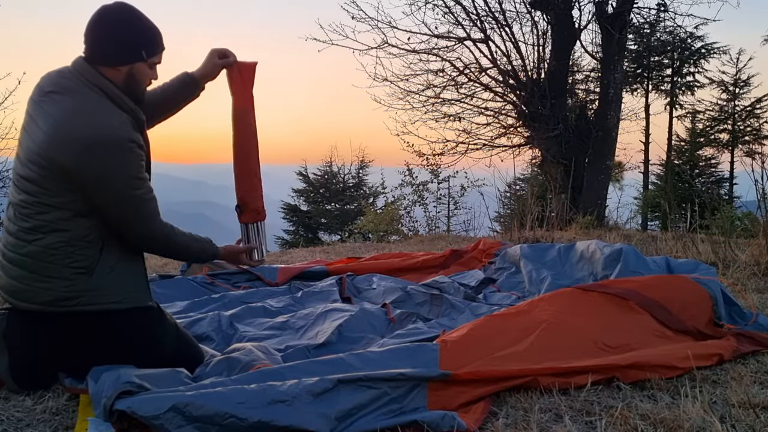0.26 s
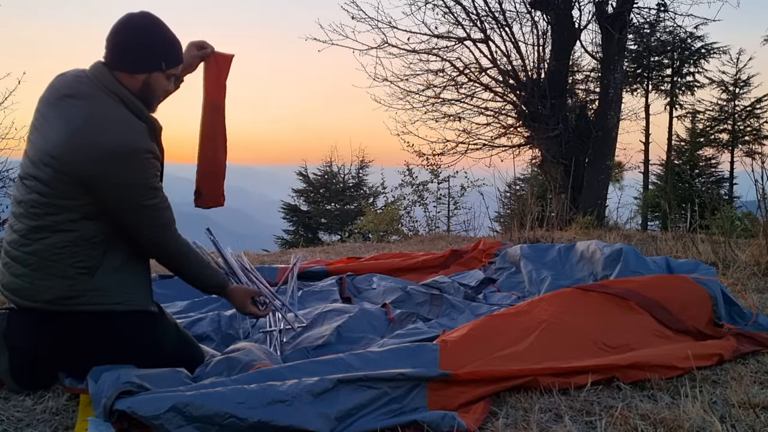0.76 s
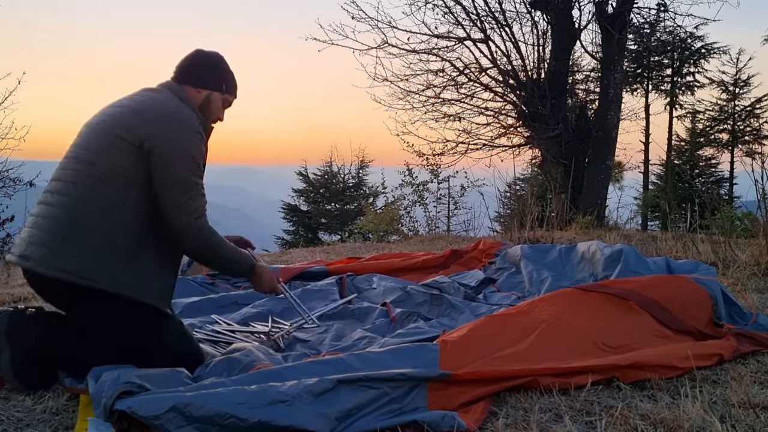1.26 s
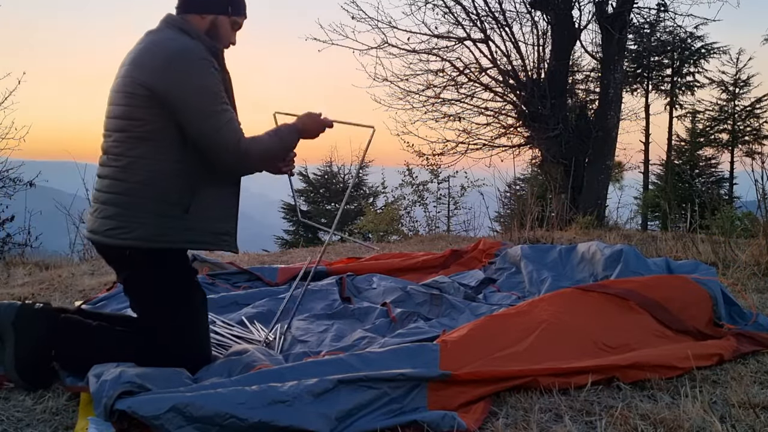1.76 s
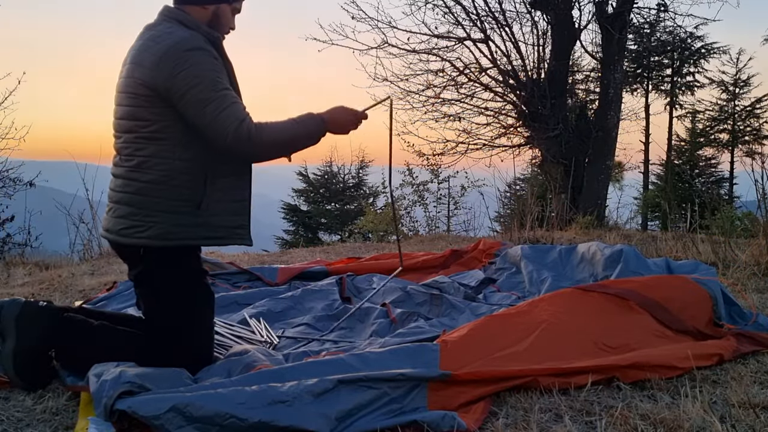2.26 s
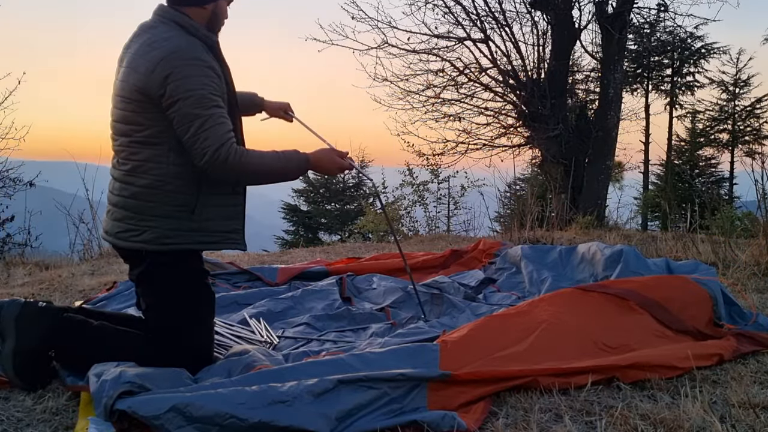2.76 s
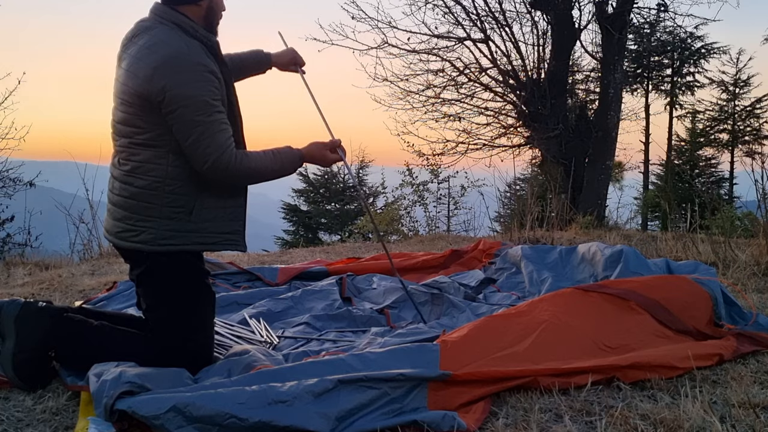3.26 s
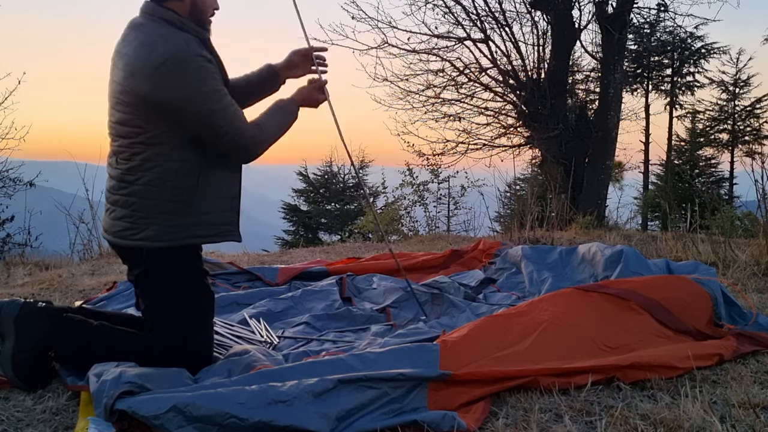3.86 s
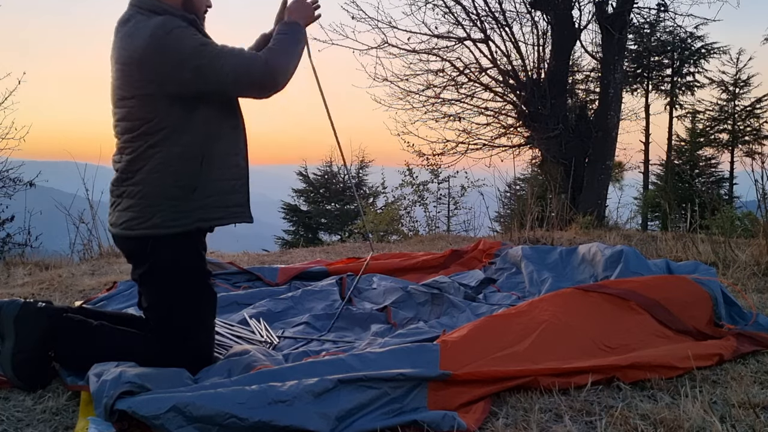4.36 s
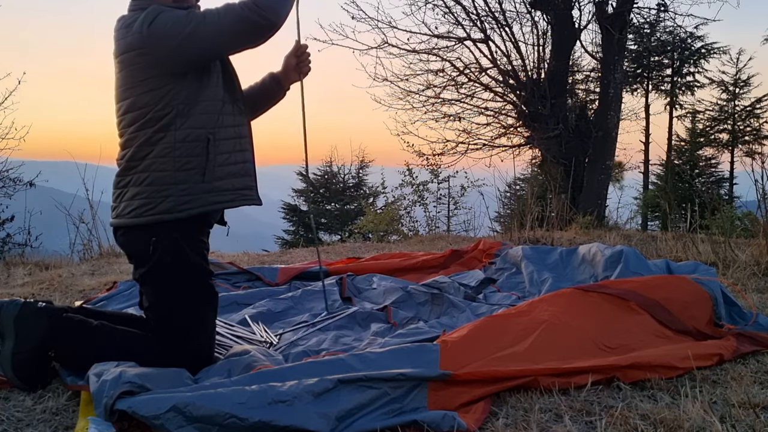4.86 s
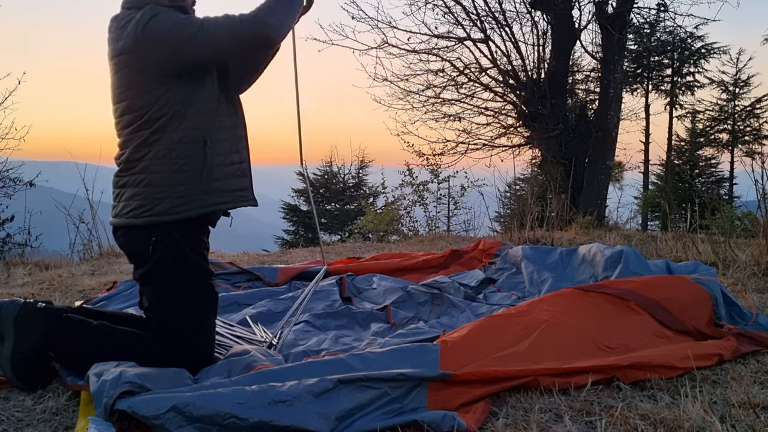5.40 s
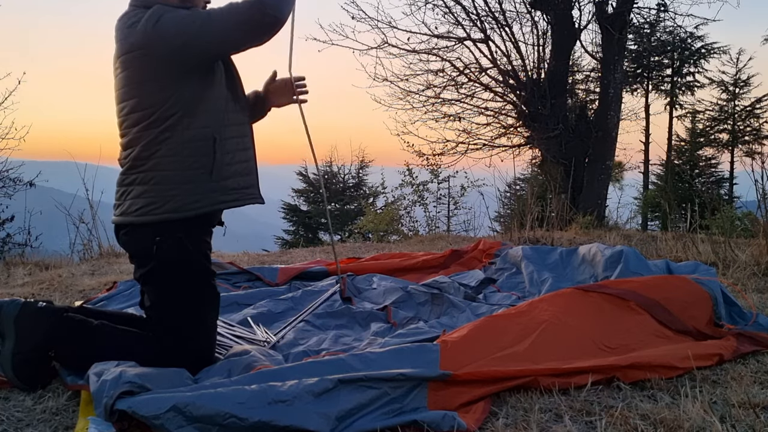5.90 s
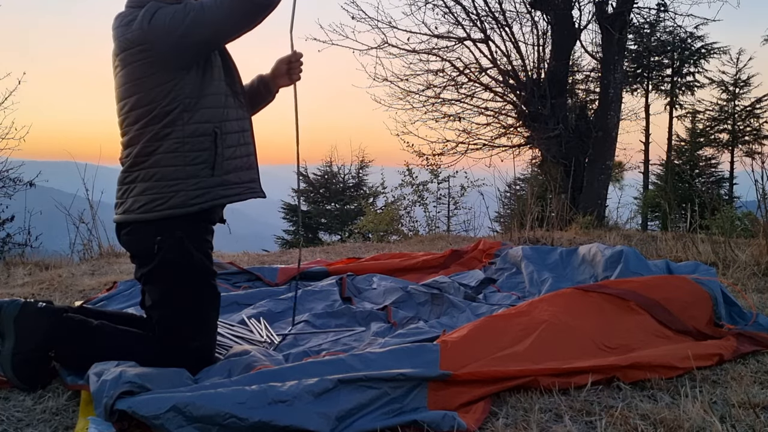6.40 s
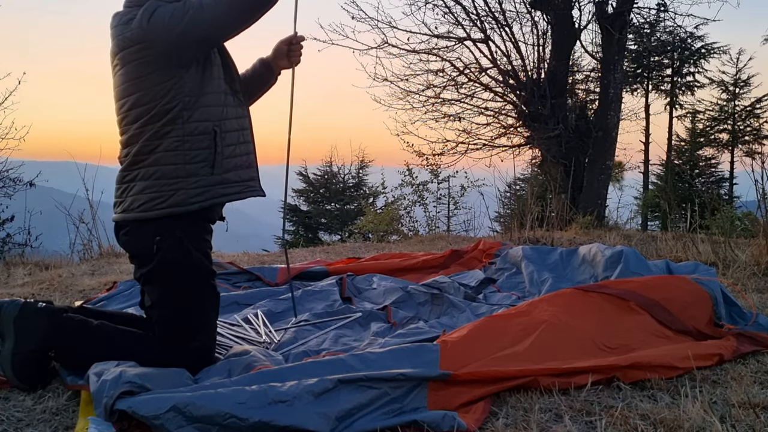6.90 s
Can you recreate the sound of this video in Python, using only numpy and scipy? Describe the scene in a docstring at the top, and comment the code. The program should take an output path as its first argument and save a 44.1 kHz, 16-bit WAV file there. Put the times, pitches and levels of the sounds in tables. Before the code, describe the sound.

Folded metal tent poles slide from a rustling nylon bag and clatter onto cloth, then sections snap together in sparse dry clicks over low wind thumps.

```python
"""Outdoors on a hillside, wind thumps the two microphone ports from the start, mostly the left one harder.
Folded tent poles slide from a rustling nylon bag and clatter onto the tent cloth, with low thuds on the soil;
then the lifted sections snap together in short dry clicks, and late on a far bird hoots faintly.
Clicks are impact noise ringing tube modes; cloth, thuds, wind and hiss are shaped noise; hoots are gliding sines."""
import sys
import numpy as np
from scipy import signal
from scipy.fft import rfft, irfft, next_fast_len
from scipy.io import wavfile
from scipy.ndimage import uniform_filter1d

SR = 44100
rng = np.random.default_rng(int(sys.argv[2]) if len(sys.argv) > 2 else 0)


def wav_record(signal):
    """Record a signal, one row per channel, as 16-bit PCM in the file named by sys.argv[1]."""
    frames = np.transpose(np.atleast_2d(signal))
    bounded = np.clip(frames, -1, 1)
    # unit amplitude maps onto the largest positive 16-bit level
    quanta = np.round(bounded * 32767).astype(np.int16)
    wavfile.write(sys.argv[1], SR, quanta)


N = 314874


def amp(db):
    """Gain of a level in dB."""
    return 10 ** (np.asarray(db) / 20)


def evened(x):
    """Scales a signal to rms 1."""
    return x / np.sqrt(np.mean(x ** 2) + 1e-20)


def read(points, hz):
    """Reads a spectrum table on a log-frequency axis."""
    f, value = np.transpose(points)
    return np.interp(np.log(hz + 1), np.log(f + 1), value)


def curves(rows, t):
    """Columns of a breakpoint table, interpolated at times t."""
    s, *columns = np.transpose(rows)
    return [np.interp(t, s, column) for column in columns]


def coloured(x, points):
    """Filters a sound by a spectrum table."""
    size = next_fast_len(N)
    gain = amp(read(points, np.fft.rfftfreq(size, 1 / SR)))
    return irfft(rfft(x, size) * gain, size)[..., :N]


def add(mix, s, sound):
    """Mixes a sound in at s seconds."""
    part = mix[:, round(s * SR):][:, :sound.shape[1]]
    part += sound[:, :part.shape[1]]


def slow(rate, channels):
    """Twice-smoothed noise of rms 1 that wanders on the scale of 1/rate seconds."""
    width = max(int(SR / rate), 2)
    smooth = uniform_filter1d(rng.standard_normal((channels, N)), width)
    return evened(uniform_filter1d(smooth, width))


def ring(hz, t60, t):
    """One dying mode: a sine that falls 60 dB in t60 seconds."""
    return amp(-60 * t / t60) * np.sin(2 * np.pi * hz * t)


# Metal on metal. Each row: peak in seconds, relative level in dB, rise in ms, then in relative dB
# the after-rattle, the low ring and the thin edge.
POLE_CLICKS = [(.2475, -26, 3.3, -4, -3, -0.5), (.2966, -20, .9, -8, -7.5, 2.5),
               (.3195, -12.5, 0.96, -11, -14, -4), (.3333, -25.5, 4.9, 4, -1, -7),
               (.4152, -30.5, 1.1, 5, -1, -1), (.4766, -18.5, 0.87, -7, -21, 6.5),
               (.5512, -27.5, .8, -10, -4, 10), (.5698, -17, 0.37, -24, -11, 8.5),
               (.6432, -22.5, .8, -14, -1, -20), (.6604, -25, .8, -13, 6, -22),
               (.7118, -21.5, 3.5, -7, -1, -3), (.7425, -18.5, 1.5, 1, -3, -5.5),
               (.7534, -17, 4.1, 3, -1, 1), (.7632, -14.5, 3.6, -20, -7, -3),
               (.775, -14.5, 1.1, -4, -7, -6), (.8313, -19.5, .6, -28, 5, -18),
               (.8651, -12, .7, -23, -12, -4), (.8934, -7.5, 1.1, -27, -4.5, -12),
               (.9163, -6.5, 1, -14, -8.5, -8), (.9251, -20, 4.3, -13, -15, -8.5),
               (.9363, -11.5, 3.6, -18, -18, -10), (.9408, -12.5, 2.6, -16, -24, -8),
               (.953, -16, 4.5, -9, -15, -6), (.9572, -9, 1.3, -18, -16, -9.5),
               (.9671, -12.5, 5.5, -18.5, -9, -2.5), (.9755, -13, 5.6, -4, -11, -0.5),
               (.9863, -12, 4.9, -13, -7.5, -8), (1.0085, -21, 2.9, -4, -3.5, -11),
               (1.0287, -18, 1.4, -14, -4, 1.5), (1.056, -10, 4.5, -20, -6, -8),
               (1.064, -17.5, 5, -10, -6, -2.5), (1.0872, -24, 3.6, 2, -5, -10),
               (1.1347, -19, 1, -25, -20, 1), (1.1871, -23, 0.7, -7.5, -9, -11),
               (1.2855, -16.5, 0.56, 0, -9, 0), (1.3928, -26, 0.71, -6, -1.5, -4),
               (1.4122, -22.5, 2.1, -9, -9, -14), (1.4267, -29, 2.2, -9, -13, -9),
               (1.4377, -24, 2.5, -10, -1.5, -2), (1.4618, -19, 1.3, -7, -5, -13),
               (1.4755, -13, 2.3, -16, -13.5, -6), (1.4839, -7.5, 0.75, -26, -11.5, -5),
               (1.5064, -15.5, 1.1, -13, -7.5, -14), (1.5246, -20, 2, -8, -8, -17),
               (1.6296, -16.5, 2.1, -27, -13, -10.5), (1.6537, -8.5, 0.835, -15, -6.5, -12),
               (1.752, -11.5, 1.6, -27.5, -5.5, -3), (1.8077, -30.5, 1.8, -11, -8, 0),
               (1.8401, -31.5, 1, -17, -1, -15), (1.8769, -22.5, 0.67, -15, -22, 0),
               (1.8822, -11.5, 0.77, -32, -9.5, -18), (2.0431, -20.5, 1.3, -13, -19, -17),
               (2.1078, -37.5, 5.9, -5, -6, -17), (2.1526, -44.5, 3.7, 7.5, -4.5, -18),
               (2.2763, -24.5, 2.5, -18, -9, -13), (2.3878, -22.5, 2.1, -21, -5, -18),
               (2.6968, -40, 2.4, -11.5, 6, -5), (2.9608, -39, 2.5, -16, -3.5, 0),
               (3.1642, -31.5, 1.1, -13.5, -0.5, -5), (3.513, -13, 2.2, -25, 0.5, -11),
               (3.5155, -26, 0.85, -11, 4.5, 4), (3.9566, -35.5, 2.1, -12.5, -14, -7),
               (4.268, -19.5, 1.6, -11.5, -8.5, -5), (4.323, -32, 1.5, -15, -6, -8),
               (4.3388, -10.5, 1.9, -38, -5.5, -8), (4.5912, -38.5, 2.6, -25, -8, -24),
               (4.6704, -37, 2.1, -10, 0, -18), (4.7228, -30, 1.5, -10, -5.5, -18),
               (4.8943, -36, 2.3, -13, -4, -5), (5.2059, -14.5, 1.5, -22, -2.5, 6),
               (5.5049, -37, 3.1, -7, -10, -15), (5.5423, -24, 1, -30.5, -10.5, -17),
               (5.8016, -15.5, 2.2, -12, -18, -7), (5.831, -22, 2.3, -23, -7, -10),
               (5.8578, -30.5, 1.8, 0, -8, -13), (5.8978, -23.5, 1.3, -1.5, -4, -11),
               (5.9136, -28, 3.8, -20, -2, -9), (5.9267, -42.5, 3.4, 5.5, 2, -13),
               (5.9864, -40.5, 3, -9, 2, -14), (6.0832, -49.5, .6, -10, 5, -16),
               (6.1139, -35, .5, -5, -8, -24), (6.2012, -38.5, 1.7, -22, -5.5, -14),
               (6.2463, -46.5, .5, -15, 6.5, -18), (6.2877, -43, 4.5, -7, -7, -16),
               (6.3274, -40, 1.4, -0.5, -7, -13), (6.3501, -38.5, 1.5, -21.5, -11.5, -11),
               (6.9488, -38.5, 2, -1, -7.5, -16), (6.9941, -30, 1, -4.5, -11, -10),
               (7.021, -37.5, 3.4, -0.5, -5, -19), (7.0843, -37.5, .9, -2, -6, -12),
               (7.1017, -12.5, 0.55, -24, -3, -6.5), (7.103, -13.5, 1.1, -29, 4.5, 3.5)]
# Modes of a tube section. Each row: frequency in Hz, relative level in dB, t60 in seconds.
TUBE_MODES = [(2680, -15, 0.002), (3670, -6, 0.0024), (4640, -8, 0.0012), (6620, -1, 0.0013),
              (8400, 1.5, 0.002), (9390, 0, 0.0041), (12370, 5.5, 0.0028), (14500, 0.5, 0.0061)]
# Heart of an impact. Each row: frequency in Hz, gain in dB.
SNAP_COLOUR = [(3000, -40.5), (4500, 2), (6000, 3), (8000, 6.5), (10000, -6.5), (12500, -27.5)]
# Dull knock of the whole section. Each row: frequency in Hz, gain in dB.
DULL_COLOUR = [(150, -14), (300, 11.5), (600, -3.5), (1100, 2.5), (1600, -6.5), (2600, -31.5)]
# Low ring of broad blows. Each row: frequency in Hz, gain in dB.
LOW_COLOUR = [(1200, -26.5), (2000, -13.5), (2700, -6.5), (3500, -0.5), (4500, -2.5), (6500, -33.5)]
# Thin edge of glancing rims. Each row: frequency in Hz, gain in dB.
THIN_COLOUR = [(8000, -38.5), (10000, 2.5), (12200, -1.5), (13500, -1.5), (15200, 2.5), (15800, -21.5),
               (17000, -30)]
# Poles rattle short on the cloth, longer and a little louder once lifted.
LIFT_S, HEAP_T60_S, HELD_T60_S, HELD_DB = 1.4, .05, .13, 1.05
DULL_DB, DULL_PER_DB = -35.5, -0.44  # hard blows carry less of the dull knock
STRIKE_T60_S = .005  # the driving burst of every strike dies in 5 ms
SCATTER_DB = 3  # whole left-right spread of the blows


def clicks():
    """Each click is a sharp strike of tiny impacts that rings the tube, then a loose after-rattle."""
    layers = np.zeros((4, 2, N))
    t = np.arange(-400, 5000) / SR
    ringing = np.arange(500) / SR
    later, earlier = np.maximum(t, 0), np.maximum(-t, 0)
    rows = POLE_CLICKS + small_ticks()
    draws = rng.random((len(rows), 4, len(t)))
    for (s, db, rise_ms, after_db, low_db, thin_db), draw in zip(rows, draws):
        rise = rise_ms / 1000
        pan_db = SCATTER_DB * (draw[1, -1] - .5)
        after_t60 = HEAP_T60_S if s < LIFT_S else HELD_T60_S

        sparse = (draw[0] < .3) * (2 * draw[1] - 1)
        impacts = evened(sparse + 0.43 * (2 * draw[2:] - 1))  # partly unlike at each port

        weights_db = -18 * draw[0, -len(TUBE_MODES):]  # every blow lands elsewhere on the tube
        tube = sum(amp(mode_db + weight_db - 7.5) * ring(hz, t60, ringing)
                   for (hz, mode_db, t60), weight_db in zip(TUBE_MODES, weights_db))
        tube[0] += 1  # the bare tick
        tube = tube / np.linalg.norm(tube)

        onset_db = -10 * (earlier / np.clip(rise, .0004, .006)) ** 2  # sets in abruptly, swells to the peak
        burst = impacts * amp(onset_db - 60 * later / STRIKE_T60_S)
        strike = signal.fftconvolve(burst, tube[None], axes=1)[:, :len(t)]
        after_shape = (1 - np.exp(-later / 0.0037)) * amp(-60 * later / after_t60)
        after = amp(after_db) * impacts * after_shape

        sides_db = np.array([[pan_db], [-pan_db]]) / 2
        sound = amp(db + HELD_DB * (s > LIFT_S) + sides_db) * (strike + after)
        shares_db = 0, DULL_DB + DULL_PER_DB * db, low_db, thin_db
        for layer, share_db in zip(layers, shares_db):
            add(layer, s + t[0], amp(share_db) * sound)
    colours = SNAP_COLOUR, DULL_COLOUR, LOW_COLOUR, THIN_COLOUR
    heart, dull, low, thin = (coloured(x, colour) for x, colour in zip(layers, colours))
    return amp(-0.32) * heart + dull + amp(6.0) * low + amp(1.0) * thin


TICKS_FROM_S, TICKS_TO_S = .34, 2
TICK_DB, TICK_SPREAD_DB = 9, 6  # top level above the rustle, random reduction
TICK_BLOW = 8.5, -7, -3.5, -0.5  # rise in ms (held to 6), then after-rattle, low ring, thin edge in relative dB


def small_ticks(count=30):
    """Rows of chance ticks among the heaped poles, stronger where the cloth is busier."""
    place, size = rng.random((count, 2)).T
    s = TICKS_FROM_S + (TICKS_TO_S - TICKS_FROM_S) * (np.arange(count) + place) / count
    levels_db = moving(s)[0] + TICK_DB - TICK_SPREAD_DB * size
    return [(start, db, *TICK_BLOW) for start, db in zip(s, levels_db)]


# Poles landing on cloth and soil. Each row: start in seconds, relative level in dB.
LANDINGS = [(0.269, -40.5), (0.68, -28.5), (0.849, -20.5), (0.936, -21), (0.974, -25), (1.006, -23.5),
            (1.034, -26), (1.069, -35), (1.299, -25), (1.333, -23), (1.477, -32.5), (1.543, -19.5),
            (1.653, -33.5), (1.755, -33), (2.065, -36), (2.102, -40), (2.451, -54), (3.617, -40.5),
            (4.588, -50), (5.829, -41.5), (6.244, -40.5)]
# Colour of a thud. Each row: frequency in Hz, gain in dB.
SOIL_COLOUR = [(150, -25), (280, -6.5), (420, -2.5), (650, -4), (1000, -11.5), (1800, -32)]
THUD_RISE_S, THUD_T60_S = .0015, .013


def thuds():
    """Each landing is a short low puff of noise, alike at both ports."""
    out, t = np.zeros((2, N)), np.arange(3000) / SR
    shape = (1 - np.exp(-t / THUD_RISE_S)) * amp(-60 * t / THUD_T60_S)
    noises = rng.standard_normal((len(LANDINGS), len(t)))
    for (s, db), noise in zip(LANDINGS, noises):
        puff = noise * shape
        add(out, s, amp(db) * (puff / np.linalg.norm(puff))[None])
    return amp(34.5) * coloured(out, SOIL_COLOUR)


# Crisp nylon creases. Each row: frequency in Hz, relative density in dB per Hz.
CREASE_COLOUR = [(1500, -20.5), (2500, -1.5), (4000, 2.5), (6000, 1), (8200, -1), (10500, -7.5),
                 (13000, -9.5), (15300, -14), (15700, -31), (16500, -40)]
# Heavy folds. Each row: frequency in Hz, relative density in dB per Hz.
FOLD_COLOUR = [(100, -19), (160, -1), (300, 2), (450, -3), (700, -7.5), (1100, -19), (1800, -30.5)]
# Cloth sliding on cloth. Each row: frequency in Hz, relative density in dB per Hz.
SLIDE_COLOUR = [(450, -25.5), (800, -2.5), (1200, 0), (1800, 2), (2600, -1.5), (4000, -17.5)]


def cloth():
    """Creases snap as dense uneven grains in clumps; sliding and heavy folds add lower scuffing."""
    t = np.arange(0, N + 64, 64) / SR
    rustle_db, folds_db, slide_db = (np.interp(np.arange(N) / SR, t, level) for level in moving(t))
    clumps_db = 1.45 * slow(60, channels=1) + 1.5 * slow(250, channels=1)
    sizes = amp(2.2 * np.minimum(rng.exponential(1, N), 5))
    happens = rng.random(N) < 6000 / SR  # about 6000 grains a second
    grains = evened(sizes * happens * rng.choice([-1., 1.], N))
    spread = rng.standard_normal((6, N))  # wide cloth reaches the ports by unlike paths
    creases = grains + 1.4 * rng.standard_normal(N) + 1.4 * spread[:2]
    folds = rng.standard_normal(N) + 0.41 * spread[2:4]
    slide = 0.2 * grains + rng.standard_normal(N) + 0.8 * spread[4:]
    crisp = amp(rustle_db + clumps_db + 4.0) * evened(coloured(creases, CREASE_COLOUR))
    heavy = amp(folds_db + 1.3 * clumps_db - 4.0) * evened(coloured(folds, FOLD_COLOUR))
    sliding = amp(slide_db + 1.2 * clumps_db - 2.5) * evened(coloured(slide, SLIDE_COLOUR))
    return crisp + heavy + sliding


# Cloth moving. Each row: peak in seconds, relative rustle level in dB, swell and fade in seconds
# (over 20 dB of rustle), then heavy folds and sliding in dB relative to the rustle.
CLOTH_STROKES = [(.08, -58, .4, 0.18, 5, 9.5), (.2, -40, 0.12, 0.1, -3.5, 8),
                 (.26, -42, 0.048, 0.037, 10, 13.5), (0.309, -29, 0.11, 0.16, -28, -2.5),
                 (.48, -35.5, 0.5, 0.72, -15.5, -5), (.71, -28, 0.11, 0.13, -10.5, -3),
                 (.85, -38, 0.077, 0.085, 10.5, 8.5), (.89, -34, 0.041, 0.087, -5, -14.5),
                 (0.951, -27, 0.059, 0.19, 4, -2), (1.05, -48, 0.1, 0.061, 5, -1),
                 (1.19, -47.5, .2, .07, 2.5, -6), (1.288, -36.5, .005, 0.22, 5, 0),
                 (1.325, -42.5, 0.044, 0.05, 16, 1.5), (1.48, -37.5, 0.043, 0.25, 2.5, -2.5),
                 (1.54, -37.5, 0.1, 0.21, -0.5, -8), (1.67, -39, 0.071, 0.079, 2.5, -6.5),
                 (1.77, -51.5, 0.086, 0.083, 9.5, -6.5), (1.85, -48, .15, 0.023, 4.5, -2.5),
                 (1.888, -50, 0.043, 0.14, 7, 1), (2.061, -43, 0.043, 0.18, 2.5, -2.5),
                 (2.28, -61, 0.055, .25, 8, 1.5), (2.46, -58.5, 0.15, 0.2, 9.5, 5),
                 (2.72, -66, 0.095, 0.22, 7.5, 7), (2.959, -67.5, 0.16, 0.97, 8.5, 4),
                 (3.62, -60.5, 0.29, 0.15, 9.5, 4.5), (3.98, -66.5, 0.75, 0.2, 2.5, -0.5),
                 (4.29, -66, .08, 0.43, 12.5, 10.5), (4.67, -58.5, 0.62, 0.28, 2, -5),
                 (4.91, -63, 0.065, 0.46, -2.5, -10), (4.99, -68, .1, .12, -8, -13),
                 (5.38, -53.5, 0.15, 0.39, -8.5, -29), (5.81, -45, 0.011, 0.27, 1, -9),
                 (6.0, -55.5, 0.23, 0.034, 0, -7.5), (6.121, -44.5, 0.011, 0.061, -0.5, -21),
                 (6.24, -59, .13, .2, 5, -5.5), (7.0, -65, 0.057, 0.11, 16, -3),
                 (7.08, -47.5, 0.11, 0.057, -17, -18), (7.14, -47, 0.077, .1, -16, -6)]
STILL_DB = -77.5, -71, -80  # the cloth at rest, relative levels: rustle, folds, sliding
QUICKER = 1.0, 1.25, 1.25  # folds and sliding swell and fade faster than the rustle


def moving(t):
    """Relative levels in dB of rustle, folds and sliding: each stroke swells to its peak and fades."""
    power = amp(2 * np.array(STILL_DB))[:, None] * np.ones(len(t))
    for s, db, swell, fade, folds_db, slide_db in CLOTH_STROKES:
        away = np.where(t < s, (s - t) / max(swell, .005), (t - s) / max(fade, .005))
        peaks_db = db + np.array([[0], [folds_db], [slide_db]])
        power = power + amp(2 * peaks_db) * amp(-40 * np.outer(QUICKER, away))
    return 10 * np.log10(power)


# Thumps of single gusts. Each row: centre in seconds, relative level in dB, half length in seconds,
# left minus right in dB.
WIND_GUSTS = [(0.07, -13, 0.029, 12), (0.185, -19.5, 0.035, 21), (0.238, -18, 0.021, -11),
              (0.331, -12.5, 0.013, 20), (0.409, -17, 0.016, 22), (0.516, -20, 0.015, -12),
              (.59, -22.5, 0.013, 17), (.81, -19, 0.039, 7), (1.13, -22.5, 0.078, 7.5),
              (1.334, -21.5, 0.037, 12.5), (1.892, -28.5, 0.088, 16), (2.416, -29.5, 0.03, 8),
              (2.545, -23.5, 0.05, 8), (2.76, -28.5, 0.085, 14.5), (2.928, -22.5, 0.032, 17.5),
              (3.288, -29.5, 0.022, 11), (3.376, -24, 0.051, 18.5), (3.575, -25.5, .04, 35.5),
              (3.922, -25.5, 0.028, -18.5), (4.2, -29, 0.038, 23.5), (4.303, -24.5, 0.043, 3),
              (4.402, -29.5, 0.02, 27.5), (4.64, -32.5, 0.023, 24), (4.784, -29.5, .03, 13),
              (5.198, -36.5, .05, 11.5), (5.33, -33.5, 0.057, 24), (5.663, -34, 0.032, 21),
              (6.106, -33, 0.019, 19), (6.245, -31, 0.022, 26), (6.344, -31.5, 0.018, 9),
              (6.418, -34, 0.014, 14), (6.624, -33, .03, 30), (6.721, -36.5, 0.037, 24.5),
              (6.816, -32.5, 0.028, 19), (7.006, -23.5, 0.034, 18.5), (7.09, -34, .025, 2)]
# Wind between gusts. Each row: time in seconds, relative level in dB, left minus right in dB.
BREEZE_LEVELS = [(0, -20.5, 17), (.3, -28, -8), (.9, -29, 6), (1.25, -34, 8), (1.75, -30.5, 14),
                 (2.15, -29, 13.5), (2.45, -43, 8), (3.1, -33, 17), (3.5, -30, 7.5), (3.85, -37.5, 0.5),
                 (4.45, -37.5, 9.5), (4.95, -43.5, 14.5), (5.5, -42, 16), (5.75, -44.5, 6.5),
                 (6.1, -37.5, 14.5), (6.5, -40, 10), (7.14, -52.5, 12)]
# Pressure swirls. Each row: frequency in Hz, relative density in dB per Hz.
SWIRL_COLOUR = [(15, -21), (30, -6), (42, 5.5), (62, 5), (85, -3.5), (110, -13.5), (160, -25.5),
                (200, -29.5), (300, -42.5), (500, -58.5), (700, -86.5)]
# Faster swirls. Each row: frequency in Hz, relative density in dB per Hz.
BUFFET_COLOUR = [(50, -30), (80, -3.5), (100, 1.5), (125, -8), (160, -21), (250, -35), (400, -66.5)]
LUMPS_DB, LUMPS_PER_S = 3, 34  # the breeze comes in lumps
BUFFET_DB, BUFFET_STEEP = 2.5, 1.634  # faster swirls grow faster than the wind itself


def wind():
    """Lumpy pressure swirls, unrelated at the two ports: a breeze and single gusts."""
    t = np.arange(0, N + 64, 64) / SR
    side = np.array([[.5], [-.5]])
    breeze_db, pan_db = curves(BREEZE_LEVELS, t)
    lumps_db = LUMPS_DB * slow(LUMPS_PER_S, channels=2)[:, (t * SR).astype(int) % N]
    power = amp(2 * (breeze_db + side * pan_db - 0.2 * abs(pan_db) + lumps_db))
    for s, db, half, pan_db in WIND_GUSTS:
        hump = np.exp(-2 * ((t - s) / max(half, .01)) ** 2)
        power = power + amp(2 * (db + side * pan_db - 0.21 * abs(pan_db))) * hump
    level = np.array([np.interp(np.arange(N) / SR, t, np.sqrt(p)) for p in power])
    swirl = coloured(rng.standard_normal((2, N)), SWIRL_COLOUR)
    swirl = swirl / np.sqrt(uniform_filter1d(swirl ** 2, 3600) + 1e-12)  # breeze and gusts set the level
    fast = evened(coloured(rng.standard_normal((2, N)), BUFFET_COLOUR))
    buffet = amp(BUFFET_DB) * level ** BUFFET_STEEP * fast
    return buffet + swirl * level * amp(1.8 * slow(41, channels=2))


# Far calls, each an arch of pitch. Each row: start in seconds, length in seconds, top pitch in Hz,
# drop at the ends as a share of the top, relative level in dB.
BIRD_HOOTS = [(4.43, .14, 1090, .07, -68), (5.21, .17, 625, .18, -58), (5.41, .17, 610, .17, -57),
              (5.57, .14, 620, .15, -61), (5.7, .08, 600, .08, -63), (5.80, .15, 610, .14, -67),
              (5.98, .13, 585, .1, -66)]


def bird():
    """Soft sine hoots that rise and fall in pitch, blurred by echoes and a flickering level."""
    out = np.zeros((2, N))
    for s, length, top_hz, drop, db in BIRD_HOOTS:
        u = np.linspace(-1, 1, round(length * SR))
        turns = np.cumsum(top_hz * (1 - drop * u ** 2)) / SR
        hoot = np.sqrt(2) * amp(db) * np.sin(2 * np.pi * turns) * (1 - u ** 4)
        add(out, s, hoot[None])
    tail = rng.standard_normal((2, 6000)) * amp(-60 * np.arange(6000) / SR / .3)  # echoes of the slopes
    out = out + amp(-38) * signal.oaconvolve(out, tail, axes=1)[:, :N]
    return out * amp(2.6 * slow(70, channels=1) - 2.2)


# Colour of the hiss. Each row: frequency in Hz, relative density in dB per Hz.
HISS_COLOUR = [(150, -18.5), (250, -2.5), (400, -14.5), (600, -14.5), (1000, -19.5), (2000, -21.5),
               (6500, -29), (10000, -26), (13500, -19), (15350, -16.5), (15650, -44.5), (16500, -51)]


def hiss():
    """Steady noise of the open air and of each microphone."""
    return amp(-62) * evened(coloured(rng.standard_normal((2, N)), HISS_COLOUR))


def ground(x):
    """A ground bounce alike at both ports, within a short scatter from cloth and trees unlike at each."""
    t = np.arange(8000) / SR
    scatter = rng.standard_normal((2, len(t))) * amp(-60 * t / 0.19) * (t > .002)
    taps = amp(-19) * evened(scatter) / np.sqrt(len(t))
    taps[:, 170] += amp(-12.5)  # the bounce
    return x + signal.oaconvolve(x, taps, axes=1)[:, :N]


# Phase lead of the left port. Each row: frequency in Hz, lead in radians.
LEFT_LEAD = [(200, 0.11), (800, 0.73), (1900, 0.51), (3300, 1.99), (5000, 1.93), (7000, 2.15), (9000, 3.1),
             (11000, 8.6), (13000, 4.7), (15500, 23)]
# Tilt between the ports. Each row: frequency in Hz, left minus right in dB.
LEFT_LEAN = [(250, 1.5), (500, 5), (1200, 6), (2200, 2), (5000, 2), (7000, 2.5), (9000, -11), (11000, -2.5),
             (14000, -1.5)]


def ports(x):
    """Sound from the left reaches the left port first; the housing tilts the treble between ports."""
    size = next_fast_len(N)
    hz = np.fft.rfftfreq(size, 1 / SR)
    half = amp(read(LEFT_LEAN, hz) / 2) * np.exp(.5j * read(LEFT_LEAD, hz))
    return irfft(rfft(x, size) * np.array([half, 1 / half]), size)[:, :N]


def scene():
    """All sources at the two ports."""
    poles = ground(clicks() + thuds())
    return ports(poles + cloth() + bird()) + wind() + hiss()


BASS_HZ, EDGE_HZ = 32.5, 16400  # low edge of the microphones, upper band limit


def record(dry):
    """The microphones lose the deepest bass, peaks round off under full scale; then the band limit."""
    thinned = signal.lfilter(*signal.butter(2, BASS_HZ, "high", fs=SR), dry)
    size = abs(thinned)
    rounded = np.sign(thinned) * np.minimum(size, .6 + .36 * np.tanh((size - .6) / .36))
    band = signal.firwin(511, EDGE_HZ, window=("kaiser", 9), fs=SR)
    return signal.oaconvolve(rounded, band[None], "same")


dry = scene()
out = record(dry)
wav_record(out)
```